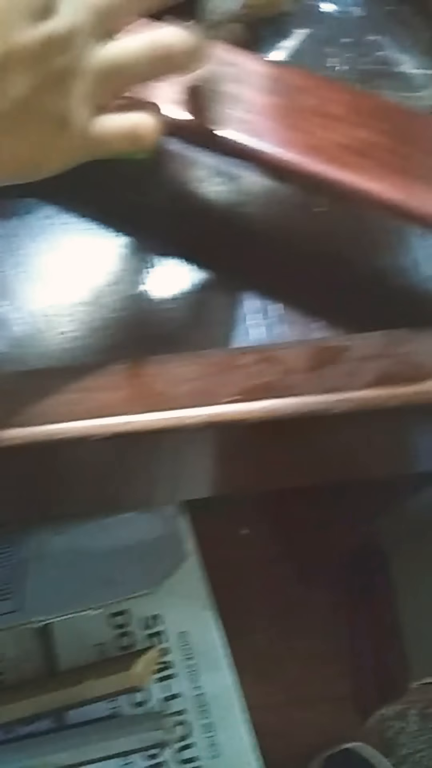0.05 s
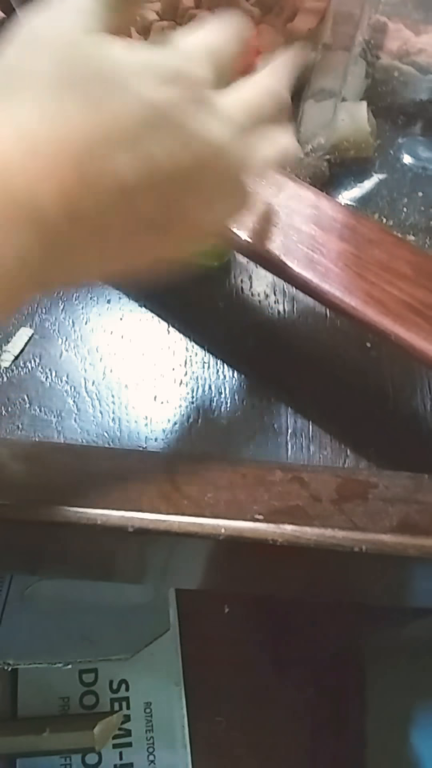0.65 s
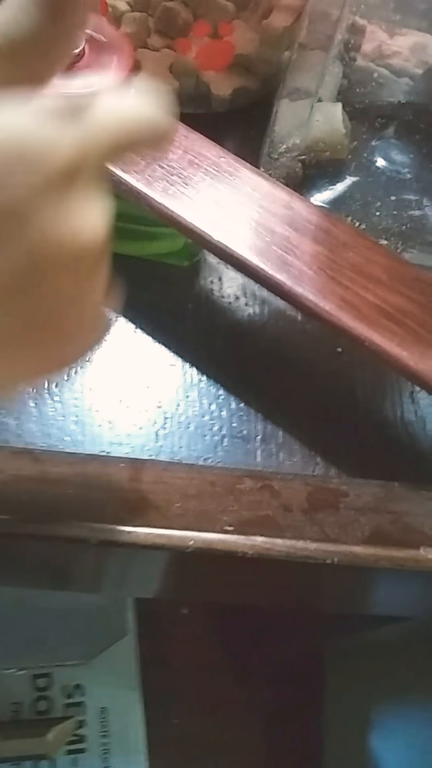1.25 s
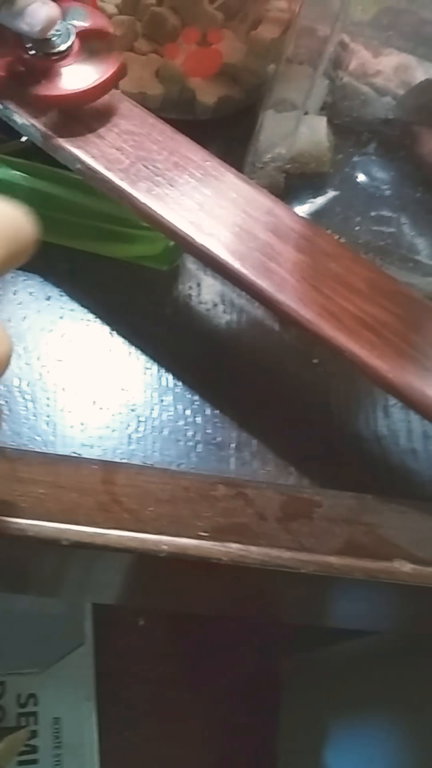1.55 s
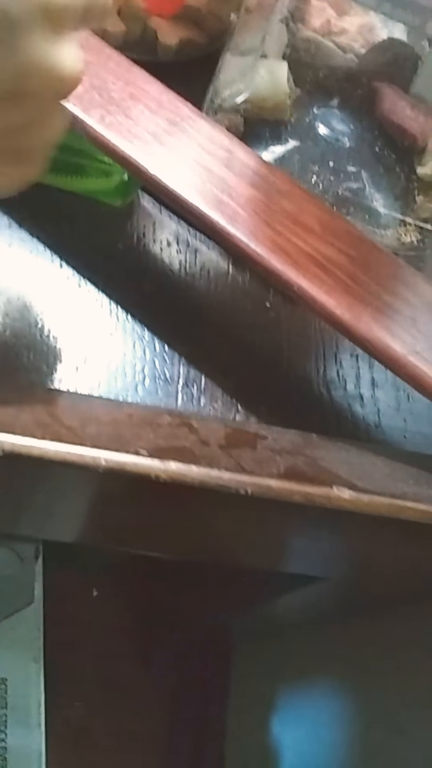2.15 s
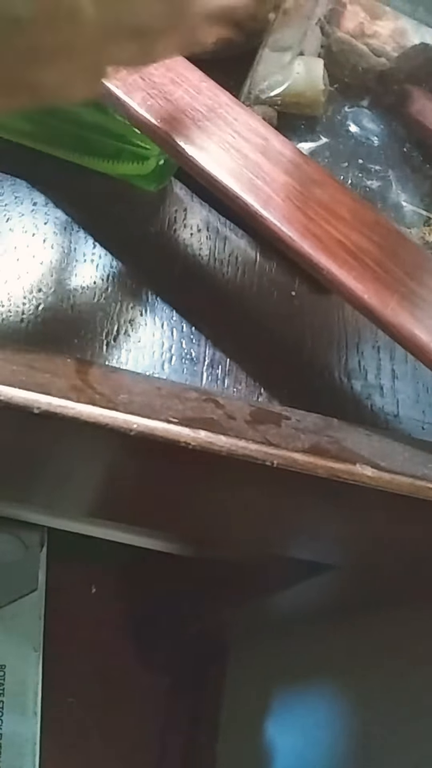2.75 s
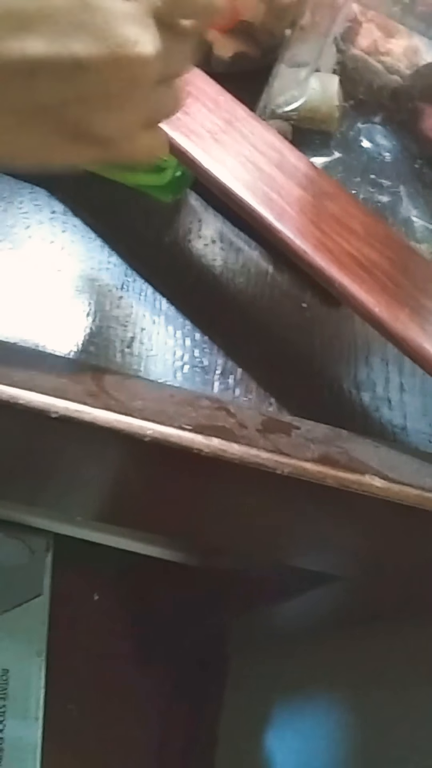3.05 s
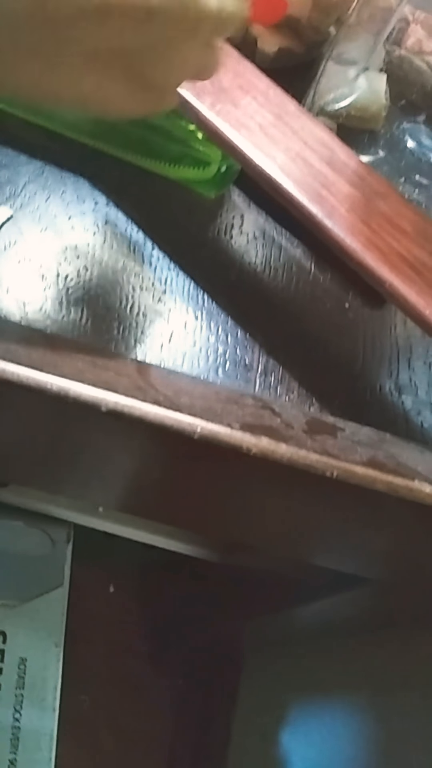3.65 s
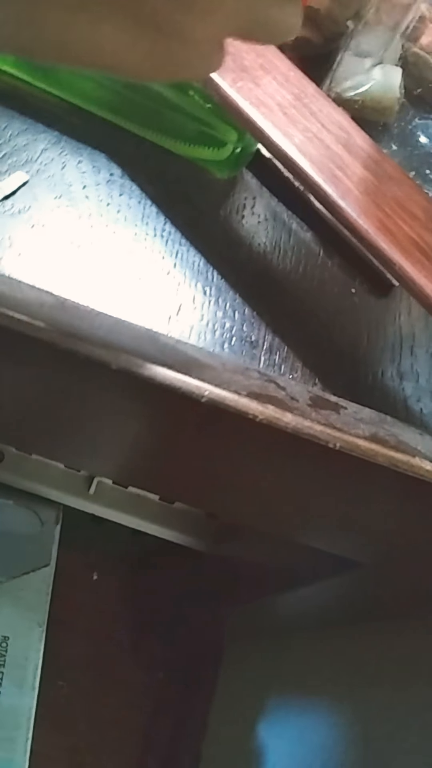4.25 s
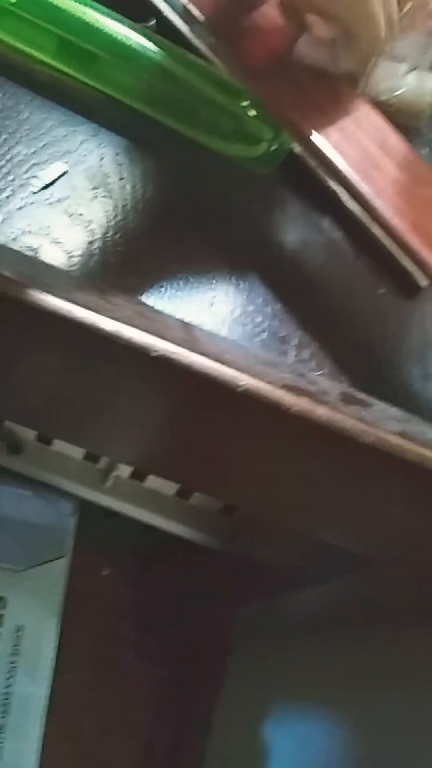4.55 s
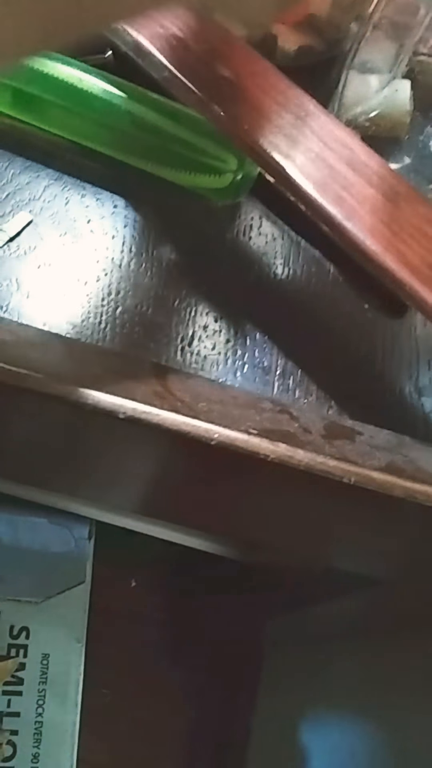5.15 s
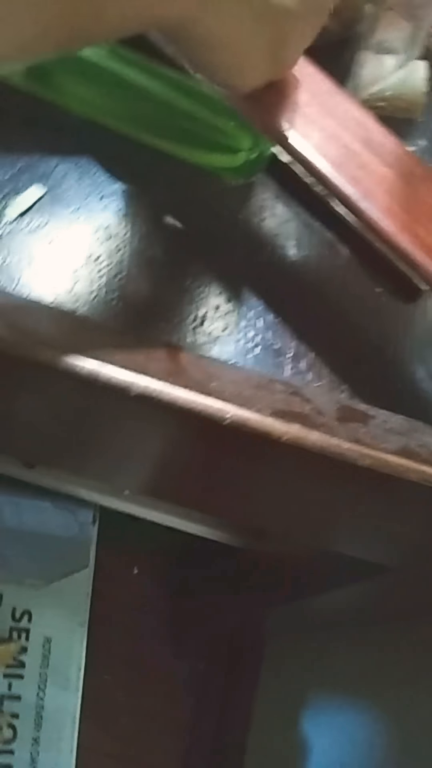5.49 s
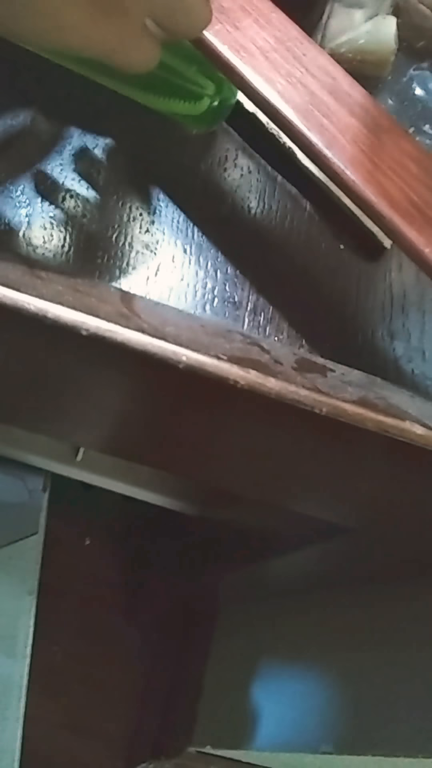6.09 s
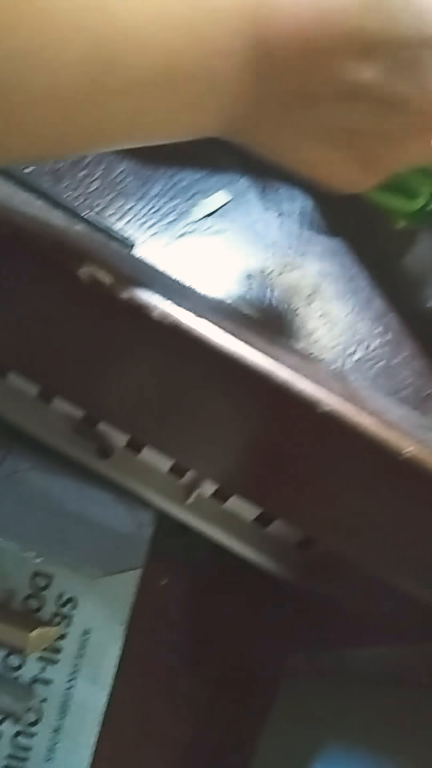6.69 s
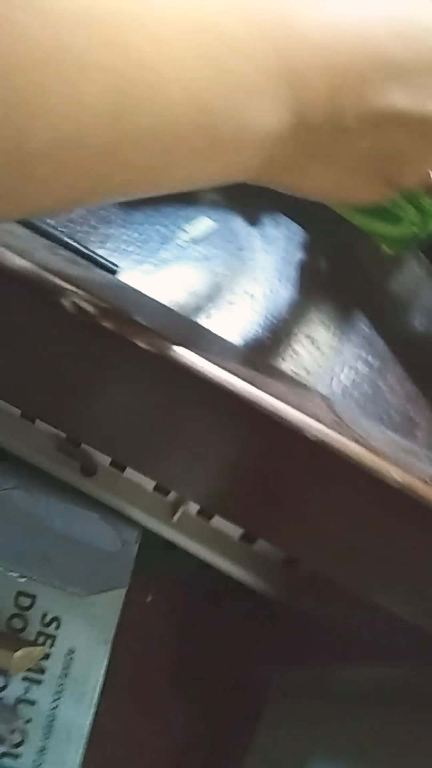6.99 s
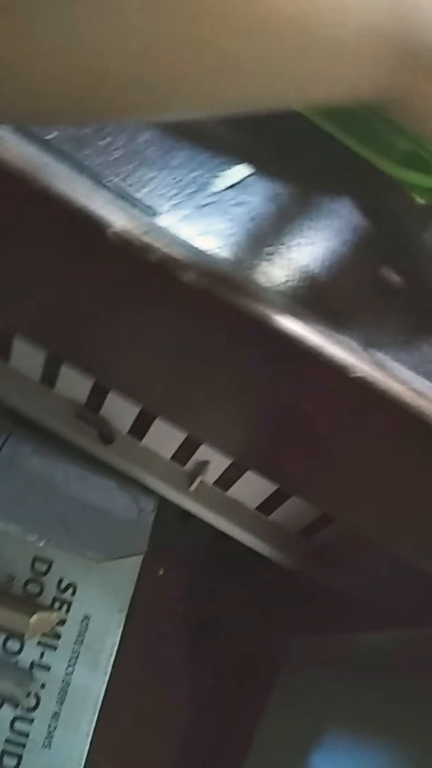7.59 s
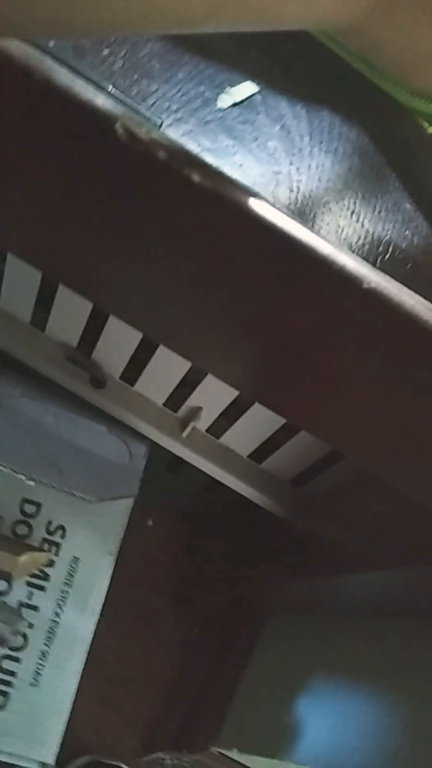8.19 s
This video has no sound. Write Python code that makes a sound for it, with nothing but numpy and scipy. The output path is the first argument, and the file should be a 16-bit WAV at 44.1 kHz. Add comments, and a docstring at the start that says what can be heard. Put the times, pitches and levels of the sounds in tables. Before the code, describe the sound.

Small hard objects click, clack and scrape on a wooden table, with a burst of hollow thuds midway and a brief plastic drag.

```python
"""Handling small objects on a wooden table

Small hard objects are picked up, scraped along and put down in a small room. Each contact makes
a click and sets the table top knocking and thudding. In between, hands brush and bump, sliding
surfaces hiss, a few short tones sound, and a plastic case is dragged. The hand-held microphone
rumbles a little over quiet room air and a mains hum."""
import sys
import numpy as np
from scipy import signal
from scipy.fft import rfft, irfft, next_fast_len
from scipy.io import wavfile
from scipy.ndimage import map_coordinates

SR = 44100
rng = np.random.default_rng(int(sys.argv[2]) if len(sys.argv) > 2 else 0)


def generate_wav(sig):
    """Save sig (samples, or channels by samples) to the path in sys.argv[1] as 16-bit PCM at SR."""
    pcm = np.round(np.clip(np.atleast_2d(sig).T, -1, 1) * 32767).astype(np.int16)
    wavfile.write(sys.argv[1], SR, pcm)


N = 367353
TIME = np.arange(N) / SR
RING = TIME[:SR // 6]   # seconds since a contact

# The grip on the microphone shifts. Each row: start and end in seconds, level in dB.
GRIP_SHIFTS = [(5.76, 5.9, -58), (6.08, 6.43, -46), (7.83, 7.99, -51.5)]
# The hiss of a brushing hand. Each row: time in seconds, relative level in dB.
BRUSH_LEVELS = [(0.0, -69), (0.184, -72), (0.462, -69.5), (0.742, -67.5), (0.886, -63.5), (0.976, -60),
                (1.166, -69.5), (1.3, -75.5), (1.42, -93)]
# Light touches. Each row: time in seconds, level in dB.
TICKS = [(.094, -58), (0.116, -59), (0.381, -53.5), (.739, -54), (1.08, -45.5), (1.131, -62),
         (2.463, -51.5), (2.556, -53), (2.712, -46.5), (2.907, -46), (3.988, -41), (4.01, -32.5),
         (4.022, -34.5), (4.196, -29.5), (4.2, -36.5), (4.549, -44.5), (4.303, -60), (4.653, -56.5),
         (5.5686, -35.5), (6.225, -52.5), (8.173, -52)]   # an edge nicks another object
BUMPS = [(0.112, -59.5), (0.383, -59), (.441, -63), (0.72, -55.5), (0.757, -58), (1.08, -59), (1.129, -58),
         (1.54, -73), (2.077, -50), (2.509, -63), (3.965, -47.5), (4.009, -47), (4.086, -50.5),
         (4.12, -45.5), (4.187, -48.5), (4.527, -56), (4.945, -51)]   # a hand or a heavier object bumps the table
# Firmer contacts. Each row: time in seconds, relative level in dB, hardness in dB.
CLACKS = [(.127, -62, 7), (.37, -59, 0), (.755, -55.5, 12), (2.063, -49, 0), (2.0702, -43, 11),
          (2.083, -47.5, 2), (2.097, -47, -10), (2.632, -56.5, 7), (2.661, -52.5, 0), (2.728, -53, 9),
          (2.767, -49.5, 4), (2.83, -50.5, 0), (2.919, -51.5, 0), (2.946, -51, 4), (2.99, -53, 6.5),
          (3.057, -52.5, 1), (3.102, -51.5, -4), (3.16, -49, -1), (3.2077, -49.5, 11.5), (3.248, -52.5, -3),
          (3.281, -49.5, -6), (3.337, -53.5, 6.5), (4.007, -41, -10), (4.071, -44, 3), (4.117, -42.5, -1),
          (4.939, -53.5, -10), (5.156, -38.5, -3.5), (5.337, -51.5, 1), (5.6, -53, 13.5), (7.628, -60, 5),
          (8.202, -60, 18.5)]   # a hollow object lands or jolts over a ridge
TAPS = [(4.911, -60, 6), (5.467, -59.5, 25), (5.571, -54, -12), (5.855, -64, -14), (6.136, -62.5, 1),
        (6.227, -57.5, -33), (6.351, -60, -5), (6.467, -54, 7), (6.545, -61.5, 26), (7.594, -56.5, 6),
        (7.729, -59.5, -8), (7.901, -49.5, 23), (7.955, -56.5, 0), (8.105, -57, 6), (8.175, -54.5, -12),
        (8.203, -49.5, -1)]   # a light, blunt tap on the table
THUDS = [(3.964, -46.5, 18.5), (4.009, -46.5, 16), (4.069, -36, 10), (4.073, -36, 5), (4.092, -28, -12),
         (4.104, -30.5, -2), (4.119, -39, -11), (4.135, -38, 0), (4.167, -41, 8), (4.184, -35.5, -6),
         (4.201, -38.5, 4), (4.255, -38.5, -0.5), (4.443, -48.5, 10), (4.519, -45, -3),
         (4.529, -41.5, -1.5), (4.549, -42, 1), (4.781, -45.5, 0.5), (4.817, -49.5, 14),
         (4.965, -53.5, 23.5)]   # a heavy object rocks and settles
# Spells of faint contacts. Each row: start and end in seconds, contacts a second, relative level in dB.
FINGER_NICKS = [(0, .75, 5, -57.5), (2.6, 3.35, 16, -51.5)]
TABLE_PATTER = [(2.65, 3.35, 11, -68), (6.7, 7.45, 6.5, -77.5)]
# The mix of each kind of contact: the dB added to its click, clack, knock and thud.
TICK_MIX_DB = (-1, -20, -19, -19.5)
CLACK_MIX_DB = (-1, -1.5, -4, -10.5)
TAP_MIX_DB = (-14.5, -9.5, -1.5, -11.5)
THUD_MIX_DB = (-17.5, -23.5, -14.5, 0)
# The share of a contact's hardness that is added to its click, clack, knock and thud.
CLACK_SHARES = (0.78, 0.16, 0.13, 0)
TAP_SHARES = (0.42, 0.15, 0, 0.12)
THUD_SHARES = (0.71, 1, 0.78, 0)
# Scuffs swell until the object slips. Each row: slip time and swell time in seconds, peak level in dB.
SCUFFS = [(0.098, 0.023, -55), (.75, 0.055, -57), (2.066, 0.0061, -45), (4.095, 0.022, -39),
          (4.118, 0.0295, -44), (4.528, 0.017, -49), (4.551, 0.013, -46), (4.734, .028, -47),
          (4.752, 0.023, -50.5), (4.78, 0.0057, -52), (4.913, 0.02, -49.5), (5.57, 0.025, -54),
          (8.202, 0.051, -57)]
# Hard edges scrape the table. Each row: start and end in seconds, hiss level and table level in dB.
SCRAPES = [(2.176, 2.302, -70, -67.5), (2.635, 2.838, -61, -66), (2.899, 3.324, -62, -63.5),
           (7.586, 7.702, -72, -69.5), (7.847, 8.076, -69.5, -65), (8.18, 8.334, -74, -69)]
# Short tones: brief squeaks, and a low ring after a knock.
# Each row: start and length in seconds, first and last pitch in Hz, level in dB.
SHORT_TONES = [(.164, 0.018, 1630, 3020, -58), (4.0, 0.075, 506, 583, -56), (4.674, 0.11, 553, 615.4, -55),
               (4.96, 0.041, 490, 475, -47.5)]
# Sliding strokes. Each row: start and end in seconds, relative level in dB.
GLIDES = [(2.47, 2.68, -61), (3.36, 3.93, -62.5)]   # a smooth face glides lightly
CASE_PULLS = [(6.27, 6.32, -58.5), (6.36, 6.46, -62), (6.57, 6.86, -57.5)]   # a plastic case is dragged

# Modes are the tones a thing rings at; wider ones die sooner.
# Each row: pitch in Hz, width in Hz, relative level in dB.
HOLLOW_MODES = [(790, 60, 2), (1058, 64, 3.5), (1670, 90, 4), (2320, 130, -7.5), (4320, 170, -5.5),
                (5800, 530, -22)]   # hollow tones heard during the brushing
CLICK_MODES = [(8260, 2300, -13.5), (8900, 2400, -13), (9660, 700, -2.5), (10760, 1400, 6.5),
               (10900, 1200, 7), (13200, 500, -8), (13900, 660, -12)]   # the bright treble peaks that colour each click
SHELL_MODES = [(2130, 720, -7), (2755, 340, -0.5), (3560, 290, 0.5), (4160, 470, -15.5), (4290, 180, -3.5),
               (5100, 650, 3), (5970, 400, -2.5), (6270, 1800, -11)]   # the objects' hollow shells
KNOCK_MODES = [(660, 41, -8), (725, 47, -5), (777, 37, -2.5), (881, 71, -1), (1061, 53, -1.5),
               (1196, 100, -8.5), (1312, 56, -6), (1664, 60, -11.5)]   # the table top's upper tones
THUD_MODES = [(229, 48, -20.5), (265, 35, 2.5), (291.7, 22.5, -2.5), (325.6, 16, -1.5), (416.6, 37, -3),
              (485, 15, -4), (553.4, 47, -2), (625, 63, -7.5)]   # its lower tones
SWAY_MODES = [(102, 55, -0.5), (154.3, 30, -0.5), (204.5, 22, -3.5), (258, 21, -7.5), (296, 200, -1),
              (425, 130, 3)]   # the whole table swaying
SIZZLE_MODES = [(10570, 330, -2), (13200, 3100, -4.5)]   # the sizzle of a glide
CASE_MODES = [(2590, 640, -18.5), (3420, 285, -15), (4930, 280, -7.5), (6700, 3100, -7), (10300, 460, 0),
              (11300, 510, -4.5), (13900, 1600, -5.5)]   # the plastic case
GRIT_MODES = [(2660, 130, -1.5), (3570, 150, -11), (5070, 210, 1)]   # its narrow, wandering tones
# A colour says how strong a noise is from low to high. Each row: frequency in Hz, relative level in dB.
AIR_COLOUR = [(24, -17), (40, -10.5), (66, 1), (93, -8), (123, -11), (160, -12.5), (300, -14.5), (430, -17),
              (620, -21), (1500, -30.5), (3500, -36), (8500, -35.5), (10700, -28), (12300, -32),
              (15500, -33)]
RUMBLE_COLOUR = [(4, -9.5), (12, 1.5), (25, -18.0), (50, -26.5), (200, -58.0), (1000, -107)]
BRUSH_COLOUR = [(120, -23), (200, -12), (365, -17), (399, -10), (462, -3), (783, -10), (1230, -20),
                (1650, -1), (2020, -9), (4330, -7.5), (8500, -11), (11000, -2.5), (15500, -10)]
SCRAPE_COLOUR = [(1200, -1), (1900, -6.5), (2600, -1), (3500, -3), (4100, -5.5), (5000, -7.5), (6500, -2),
                 (8600, -6.5), (9400, 2), (10400, 6), (12400, 2.5), (13400, -14.5), (15000, -4)]
TABLE_COLOUR = [(150, -1), (280, 1.5), (580, -4.5), (770, 4), (900, -7), (1050, 5), (1250, -12), (1700, -8),
                (2400, -18.5)]
GLIDE_COLOUR = [(300, -26), (600, -14), (750, -1.5), (1030, -1.5), (1200, -6), (1650, -5.5), (2700, -9),
                (3600, -9.5), (4600, -18), (7000, -16), (15500, -22)]
# How long the room echoes. Each row: frequency in Hz, seconds to fade by 60 dB.
ECHO_FADE = [(200, 0.34), (530, 0.1), (1400, 0.48), (3700, 0.15), (10000, 0.4)]
# How loud it echoes. Each row: frequency in Hz, level in dB against the direct sound.
ECHO_LEVELS = [(200, -7.5), (450, -7), (900, -11), (3000, -9), (10000, -19)]


def from_db(db):
    """Turn decibels into a gain to multiply by."""
    return 10 ** (np.asarray(db) / 20)


def rms_one(x):
    """Scale a sound so that its average power is 1."""
    return x / np.sqrt(np.mean(x ** 2) + 1e-20)


def energy_one(x):
    """Scale a sound so that its total energy is 1."""
    return x / np.sqrt(np.sum(x ** 2) + 1e-20)


def at_hz(points, hz):
    """Read a table between its rows, giving each octave equal room."""
    freqs, values = np.transpose(points)
    return np.interp(np.log(np.maximum(hz, 1)), np.log(freqs), values)


def add(track, s, sound):
    """Mix a sound into a track, starting at s seconds."""
    start = max(round(s * SR), 0)
    track[start:start + len(sound)] += sound[:max(N - start, 0)]


def band_pass(x, low_hz, high_hz):
    """Keep what lies between two frequencies."""
    return signal.sosfilt(signal.butter(2, [low_hz, high_hz], "band", fs=SR, output="sos"), x)


def coloured(x, colour):
    """Give a noise a colour, at power 1."""
    size = next_fast_len(N)
    hz = np.arange(size // 2 + 1) * SR / size
    return rms_one(irfft(rfft(x, size) * from_db(at_hz(colour, hz)), size)[:N])


def rings(modes):
    """Make one dying tone for each mode."""
    return np.array([from_db(db) * energy_one(np.sin(2 * np.pi * hz * RING) * np.exp(-np.pi * width * RING))
                     for hz, width, db in modes])


def resonant(x, modes):
    """Let a sound set modes ringing, at power 1."""
    signs = (-1) ** np.arange(len(modes))
    return rms_one(signal.fftconvolve(x, signs @ rings(modes))[:N])


def strokes(rows, attack_s, sag_db_per_s, release_s):
    """A gain curve for strokes: each takes hold, eases off steadily and dies away."""
    out = 0
    for start, end, level_db in rows:
        held_s = np.clip(TIME - start, 0, end - start)
        onset = np.clip((TIME - start) / attack_s, 0, 1)
        release = np.exp(-np.clip((TIME - end) / release_s, 0, 20))
        out = out + onset * release * from_db(level_db - sag_db_per_s * held_s)
    return out


def stick_slip(per_s, depth_db):
    """A curve that wobbles around 1, as surfaces grip and let go unevenly."""
    times = np.cumsum(rng.exponential(1 / per_s, size=4000))
    swings = np.clip(rng.standard_normal(len(times)), -2, 2)
    return np.interp(TIME, times, from_db(depth_db * swings))


def friction(grains_per_s, spread_db, grain_db, flutter_db):
    """Hiss plus tiny catches; the touching point wanders, so each band flutters on its own."""
    edges_hz = np.linspace(10, 128, 19) ** 2
    groups, out = 6, 0   # each catch is heard in one group of bands
    white = rng.standard_normal((2, N))
    sizes = from_db(spread_db * np.minimum(rng.exponential(1, N), 4)) * rng.choice([-1, 1], N)
    caught = rng.random(N) < groups * grains_per_s / SR
    catches = np.sqrt(groups) * from_db(grain_db) * rms_one(sizes * caught)
    group = rng.integers(0, groups, N)
    for k, (low, high) in enumerate(zip(edges_hz, edges_hz[1:])):
        hiss = white[k % 2] * stick_slip(per_s=80, depth_db=flutter_db)
        out = out + band_pass(hiss + catches * (group == k % groups), low, high)
    return out


def background(hum_hz=120, hum_db=-76):
    """Room air, mains hum and the rumble of the hand holding the microphone."""
    air = from_db(-70.5) * coloured(rng.standard_normal(N), AIR_COLOUR)
    hum = from_db(hum_db) * np.sqrt(2) * np.sin(2 * np.pi * hum_hz * TIME)
    grip_gain = from_db(-71.5) + strokes(GRIP_SHIFTS, attack_s=0.04, sag_db_per_s=39, release_s=0.039)
    rumble = grip_gain * coloured(rng.standard_normal(N), RUMBLE_COLOUR)
    return air + hum + rumble


def brushing():
    """Skin brushes the objects in a soft hiss that follows the pressure; hollow tones sound with it."""
    times, levels_db = np.transpose(BRUSH_LEVELS)
    end_fades = np.clip(1 + np.minimum(TIME - times[0], times[-1] - TIME) / 0.013, 0, 1)
    hiss_gain = end_fades * from_db(np.interp(TIME, times, levels_db) + 3)
    hollow_gain = strokes([(0, 1.298, -68)], attack_s=0.006, sag_db_per_s=1, release_s=0.044)
    rub = friction(grains_per_s=660, spread_db=7, grain_db=-6, flutter_db=4)
    hollow = resonant(rng.standard_normal(N), HOLLOW_MODES)
    return hiss_gain * coloured(rub, BRUSH_COLOUR) + hollow_gain * hollow


def scattered(spells, most=16, spread_db=3):
    """Scatter faint contacts unevenly through each spell, giving a time and a level for each."""
    rows = []
    for start, end, per_s, level_db in spells:
        place, size = rng.random((most, 2)).T
        times = start + (np.arange(most) + place) / per_s
        levels_db = level_db + spread_db * (2 * size - 1)
        rows += [(s, db) for s, db in zip(times, levels_db) if s < end]
    return rows


def voiced(rows, mix_db, shares):
    """Give each contact its click, clack, knock and thud levels: harder is brighter."""
    return [(s, *(level_db + np.array(mix_db) + hardness_db * np.array(shares)))
            for s, level_db, hardness_db in rows]


def dying_noise(fade_ms, rise_ms=0.55):
    """A burst that builds as surfaces press together, then falls 60 dB in fade_ms."""
    ms = 1000 * RING
    envelope = (1 - np.exp(-ms / rise_ms)) * from_db(-60 * ms / fade_ms)
    return energy_one(rng.standard_normal(len(RING)) * envelope)


def struck(modes, times, levels_db, chatter_ms, snap_db, dense_db, buzz_db, buzz_ms):
    """Each contact sets the modes ringing with a snap, a tiny chatter and a faint after-buzz."""
    tones, out = rings(modes), np.zeros(N)
    for s, level_db in zip(times, levels_db):
        force = dying_noise(chatter_ms) + from_db(buzz_db) * dying_noise(buzz_ms)
        force[0] += from_db(snap_db)
        force = band_pass(force, 0.8 * modes[0][0], 1.2 * modes[-1][0])
        # where it lands decides how strongly each mode rings
        weights = from_db(3 * rng.standard_normal(len(modes))) * rng.choice([-1, 1], len(modes))
        ringing = energy_one(signal.fftconvolve(force, weights @ tones)[:len(RING)])
        # many quickly dying modes fill the gaps between the clear ones
        sound = energy_one(ringing + from_db(dense_db) * energy_one(force))
        add(out, s, from_db(level_db) * np.sqrt(SR / 100) * sound)   # level as if it lasted 10 ms
    return out


def contacts():
    """The object clicks and clacks; the table answers lower and longer with a knock and a thud."""
    ticks = [(s, *(db + np.array(TICK_MIX_DB))) for s, db in TICKS + scattered(FINGER_NICKS)]
    patter = [(s, db, 0) for s, db in scattered(TABLE_PATTER)]
    clacks = voiced(CLACKS, CLACK_MIX_DB, CLACK_SHARES)
    taps = voiced(TAPS + patter, TAP_MIX_DB, TAP_SHARES)
    thuds = voiced(THUDS, THUD_MIX_DB, THUD_SHARES)
    times, click_db, clack_db, knock_db, thud_db = np.transpose(ticks + clacks + taps + thuds)
    click = struck(CLICK_MODES, times, click_db,
                   chatter_ms=11.7, snap_db=-17, dense_db=-7, buzz_db=-9, buzz_ms=117)
    clack = struck(SHELL_MODES, times, clack_db,
                   chatter_ms=20, snap_db=-5.5, dense_db=3, buzz_db=-7, buzz_ms=110)
    knock = struck(KNOCK_MODES, times, knock_db,
                   chatter_ms=81, snap_db=-7, dense_db=-14, buzz_db=-8.5, buzz_ms=170)
    thud = struck(THUD_MODES, times, thud_db,
                  chatter_ms=33, snap_db=5, dense_db=-10.5, buzz_db=-12.5, buzz_ms=230)
    return click + clack + knock + thud


def scraping():
    """Hard edges hiss as they slide and set the table murmuring; scuffs are brief, swelling slides."""
    grain = friction(grains_per_s=300, spread_db=4, grain_db=0.5, flutter_db=2)
    grain *= stick_slip(per_s=140, depth_db=4.5)
    hiss_rows = [(start, end, db) for start, end, db, _ in SCRAPES]
    table_rows = [(start, end, db + 0.1) for start, end, _, db in SCRAPES]
    hiss_gain = strokes(hiss_rows, attack_s=0.005, sag_db_per_s=1, release_s=0.02)
    table_gain = strokes(table_rows, attack_s=0.015, sag_db_per_s=20, release_s=0.037)
    for slip_s, swell_s, db in SCUFFS:
        swell, drop = 2 * (TIME - slip_s) / swell_s, (slip_s - TIME) / 0.0023
        hiss_gain += from_db(db) * np.exp(np.maximum(np.minimum(swell, drop), -20))
    return hiss_gain * coloured(grain, SCRAPE_COLOUR) + table_gain * coloured(grain, TABLE_COLOUR)


def bumps():
    """A soft blow stirs only the table's lowest modes."""
    tones, out = rings(SWAY_MODES), np.zeros(N)
    soft_onset = 1 - np.exp(-RING / 0.0074)
    for s, level_db in BUMPS:
        sound = energy_one(rng.choice([-1, 1], len(tones)) @ tones * soft_onset)
        add(out, s, from_db(level_db) * np.sqrt(SR / 100) * sound)
    return out


def short_tones():
    """Brief squeaks and a low ring: each tone swells and fades while its pitch slides."""
    out = np.zeros(N)
    for s, length_s, start_hz, end_hz, level_db in SHORT_TONES:
        hz = np.linspace(start_hz, end_hz, int(length_s * SR))
        tone = np.sin(2 * np.pi * np.cumsum(hz) / SR)
        add(out, s, from_db(level_db) * np.hanning(len(tone)) * tone)
    return out


def gliding():
    """Light pressure hardly catches: a thin sizzle fades over a steadier hollow rub."""
    sizzle_gain = from_db(-0.5) * strokes(GLIDES, attack_s=0.033, sag_db_per_s=18.5, release_s=0.042)
    rub_gain = from_db(-6) * strokes(GLIDES, attack_s=0.0067, sag_db_per_s=6.5, release_s=0.046)
    rub = friction(grains_per_s=300, spread_db=7, grain_db=-5, flutter_db=3)
    return sizzle_gain * resonant(rub, SIZZLE_MODES) + rub_gain * coloured(rub, GLIDE_COLOUR)


def dragging():
    """Quick slips shake the plastic case and the table; the case's lower tones wander with the grip."""
    rasp_gain = strokes(CASE_PULLS, attack_s=0.0089, sag_db_per_s=29, release_s=0.033)
    body_gain = strokes(CASE_PULLS, attack_s=0.0062, sag_db_per_s=17, release_s=0.059)
    slips = friction(grains_per_s=600, spread_db=4.5, grain_db=3, flutter_db=6.5)
    slips *= stick_slip(per_s=460, depth_db=4)
    position = np.cumsum(stick_slip(per_s=30, depth_db=0.5))   # reading at uneven speed bends the pitch
    grit = map_coordinates(resonant(slips, GRIT_MODES), [position], order=3, mode="mirror")
    body = from_db(-10.5) * coloured(slips, TABLE_COLOUR) + from_db(-18) * grit
    return rasp_gain * resonant(slips, CASE_MODES) + body_gain * body


def room_echo(x):
    """Nearby surfaces send back a blur of echoes; each band fades at its own pace."""
    t, edges_hz, tail = TIME[:SR // 2], np.geomspace(100, 16000, 9), 0
    build_up = np.clip((t - 0.003) / 0.0014, 0, 1)
    for low, high in zip(edges_hz, edges_hz[1:]):
        hz = np.sqrt(low * high)
        fade = from_db(-60 * t / at_hz(ECHO_FADE, hz))
        echoes = energy_one(rng.standard_normal(len(t)) * build_up * fade)
        tail = tail + from_db(at_hz(ECHO_LEVELS, hz)) * band_pass(echoes, low, high)
    return signal.fftconvolve(x, tail)[:N]


def scene():
    """Mix the handling sounds, their echo and the background into one channel."""
    handling = contacts() + bumps() + brushing() + scraping() + gliding() + dragging() + short_tones()
    return (handling + room_echo(handling) + background())[None]


def record(dry):
    """The microphone softens the highest treble, which is then cut off steeply."""
    soften_hz, cutoff_hz = 15000, 15600
    softened = signal.sosfilt(signal.butter(2, soften_hz, fs=SR, output="sos"), dry)
    return signal.sosfilt(signal.ellip(10, 0.1, 70, cutoff_hz, fs=SR, output="sos"), softened)


dry = scene()
out = record(dry)
generate_wav(out)
```